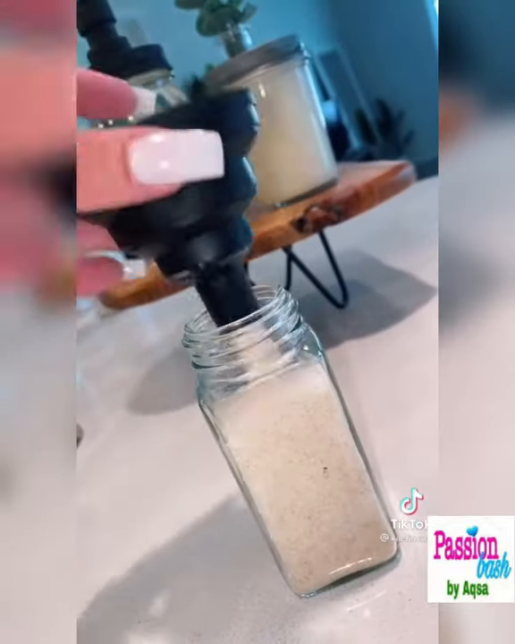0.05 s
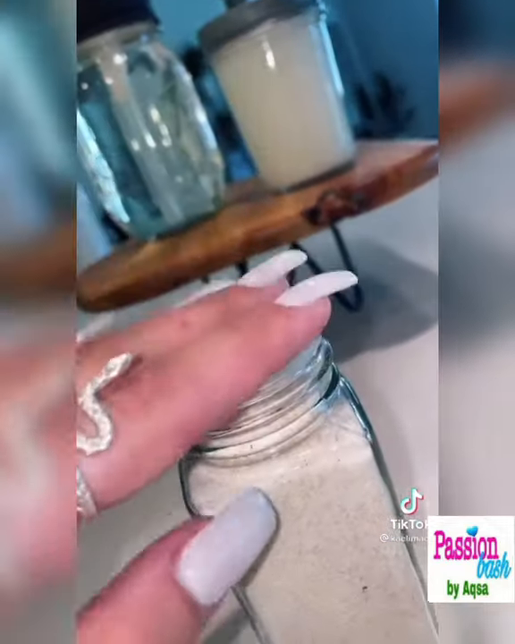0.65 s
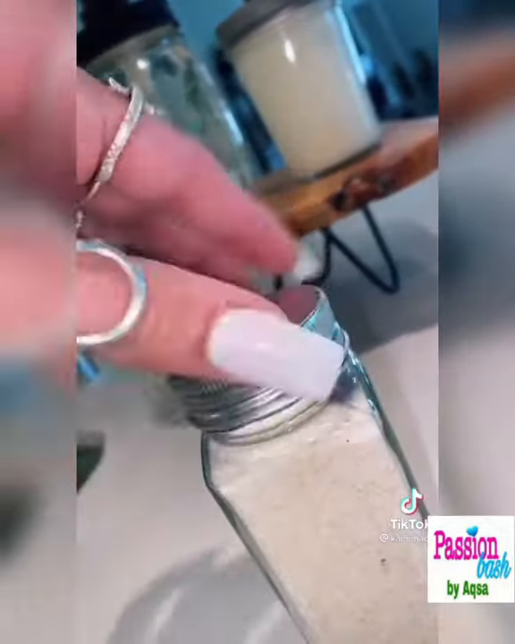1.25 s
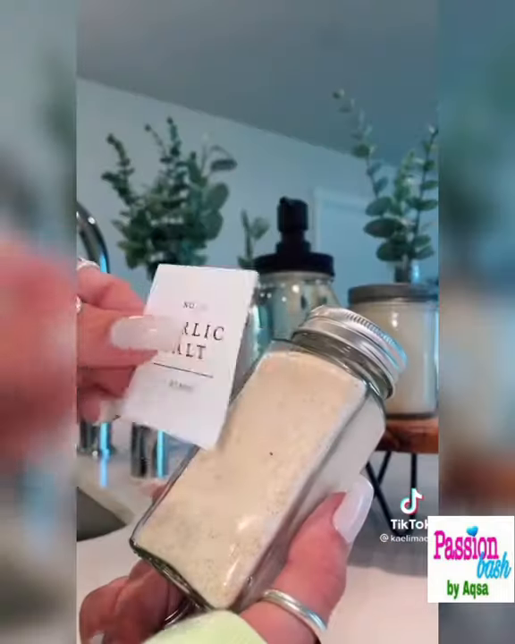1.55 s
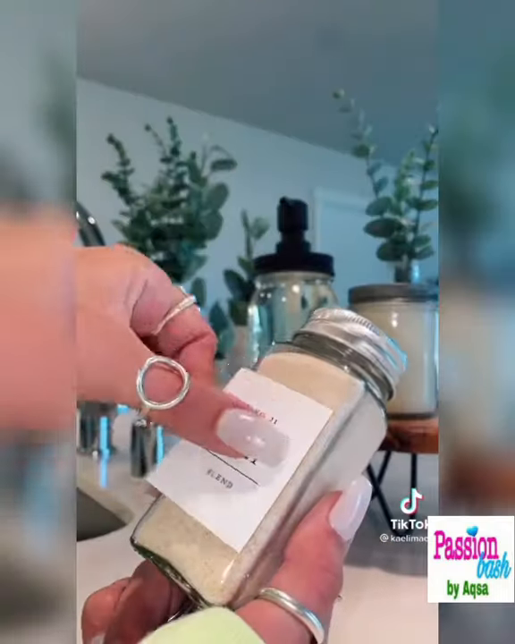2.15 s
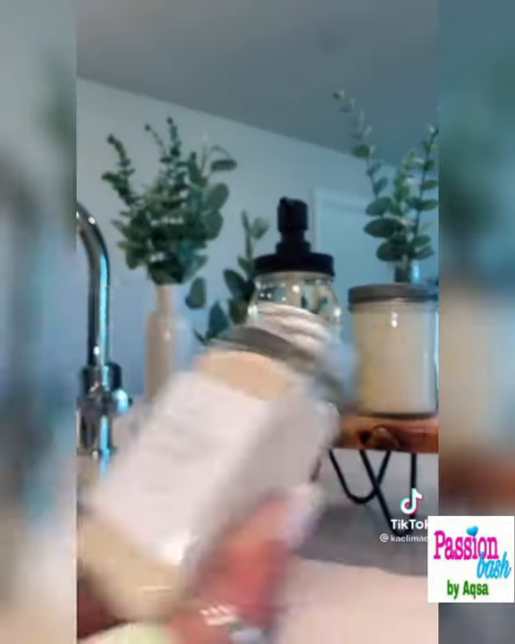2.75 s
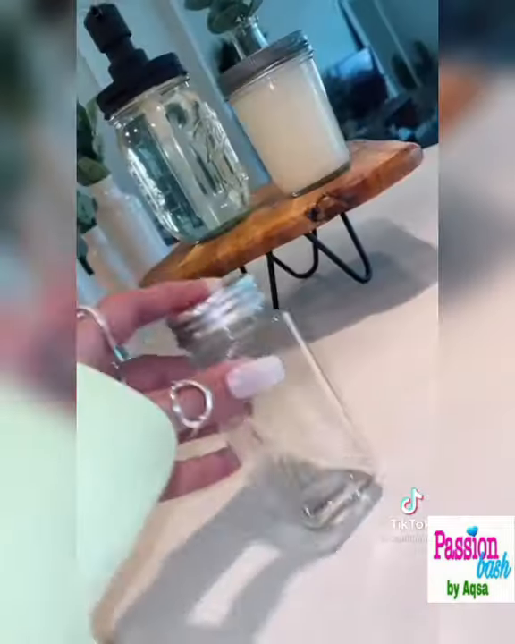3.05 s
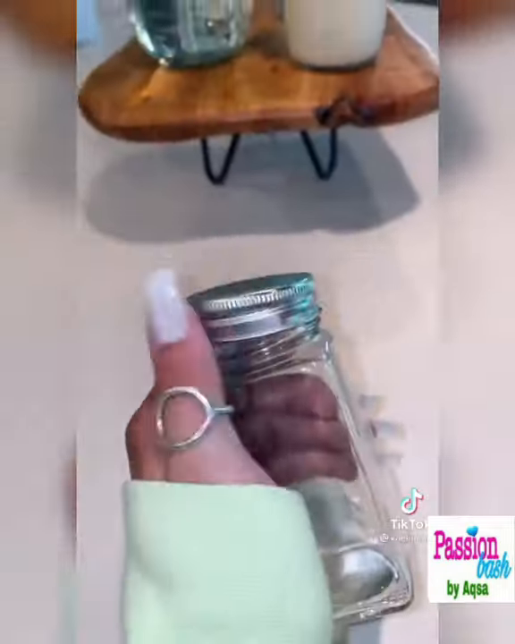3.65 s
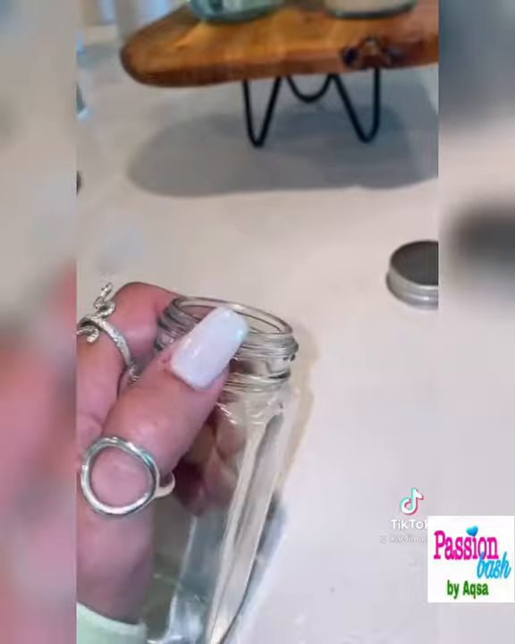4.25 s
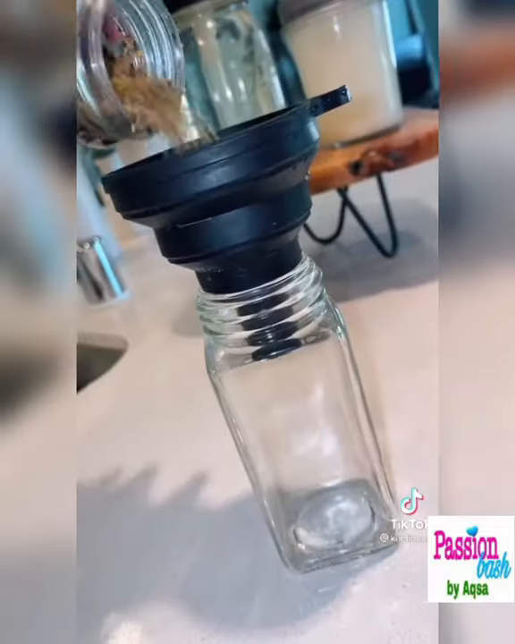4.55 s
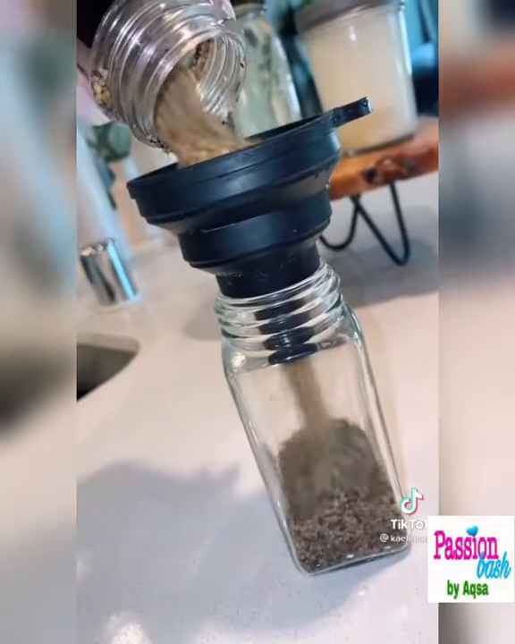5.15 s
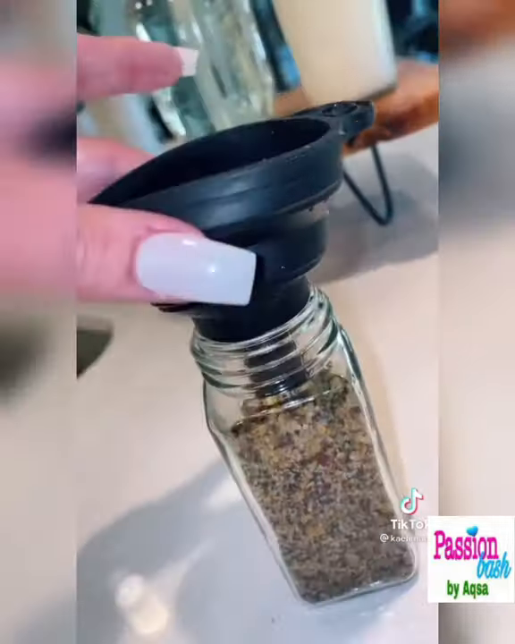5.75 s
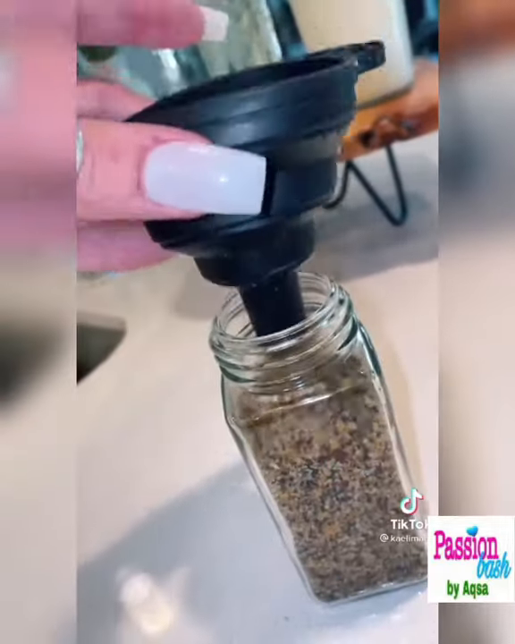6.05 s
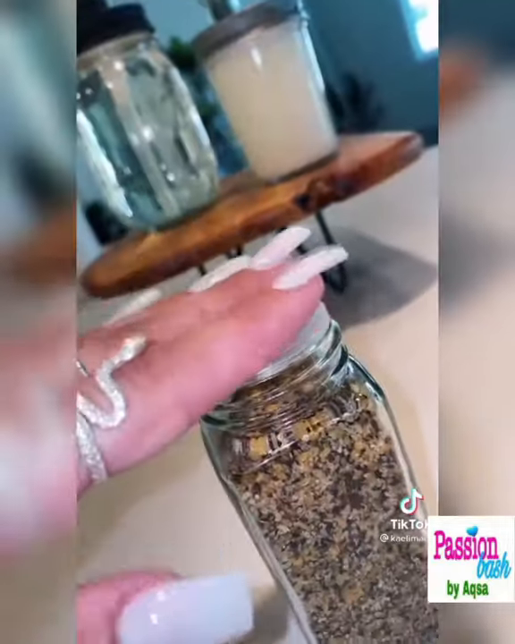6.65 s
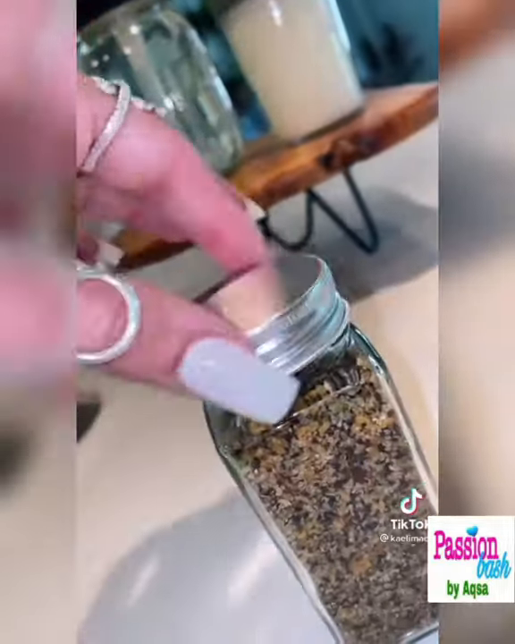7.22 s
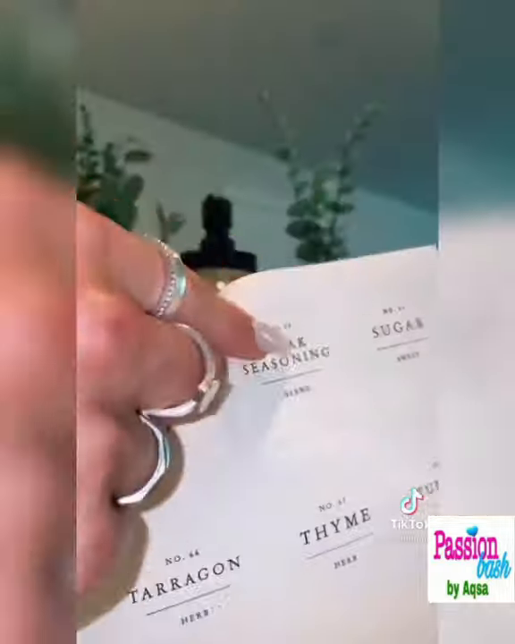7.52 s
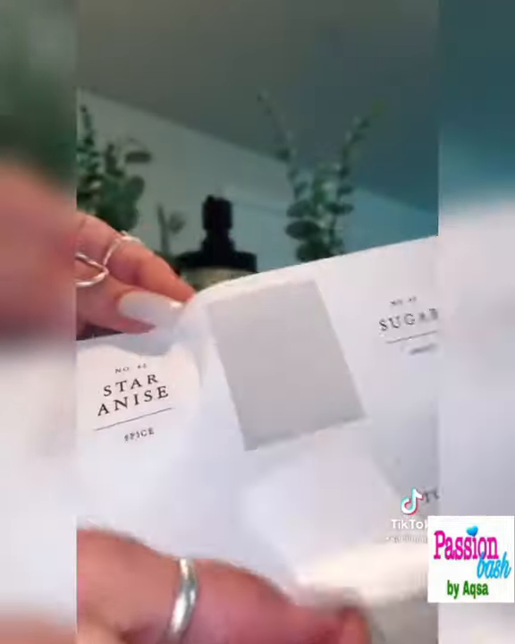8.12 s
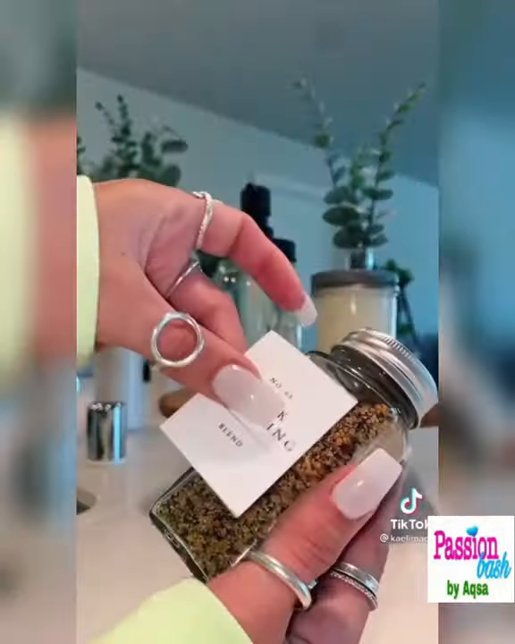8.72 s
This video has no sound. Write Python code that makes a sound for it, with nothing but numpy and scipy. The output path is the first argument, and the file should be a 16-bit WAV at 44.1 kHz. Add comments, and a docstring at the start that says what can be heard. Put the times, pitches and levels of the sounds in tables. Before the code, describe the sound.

Close to the microphone in a quiet kitchen, small glass jars are closed, opened and filled. First come a cap's snap, short scrapes of a metal lid and light paper ticks. Then dull knocks, loud lid clinks and a hollow pop lead to a soft hiss of spice running through a funnel into glass. More knocks and lid twists follow, and a sticky label crackles off its sheet over a faint room hum.

```python
"""Small glass spice jars are handled, filled and labelled close by on a kitchen counter.
Impacts excite the damped modes of the jars, their thin metal lids and their plastic sifter caps, and
stick-slip friction makes the lids rasp on the glass threads. Spice patters through a plastic funnel and
rings the glass until the heap damps it; paper labels buckle and peel. A low room drone lies beneath,
and the whole sound drops out briefly between short passages."""
import sys
import numpy as np
from scipy import signal
from scipy.fft import rfft, irfft
from scipy.io import wavfile

SR = 44100
rng = np.random.default_rng(int(sys.argv[2]) if len(sys.argv) > 2 else 0)


def file_out(sig):
    """Save sig as 16-bit WAV at sys.argv[1]."""
    # one column per channel
    cols = np.atleast_2d(sig).T
    # limit, then scale
    lim = np.clip(cols, -1, 1)
    pcm = np.round(lim * 32767).astype(np.int16)
    wavfile.write(sys.argv[1], SR, pcm)


N = 396018
TAPS = 8192
HZ = np.fft.rfftfreq(TAPS, 1 / SR)  # frequency axis of the gain curves


def amp(db):
    """Amplitude ratio: a factor of ten for every 20 dB."""
    return 10 ** (np.asarray(db) / 20)


def unit_rms(x):
    """Normalisation to unit mean power."""
    return x / np.sqrt(np.mean(x ** 2) + 1e-20)


def curve(points, hz=HZ):
    """Interpolation of (Hz, value) points on a logarithmic frequency axis."""
    point_hz, value = np.transpose(points)
    return np.interp(np.log(hz + 1), np.log(point_hz + 1), value)


def add(mix, s, sound):
    """Superposition: a sound joins the mix at s seconds; what falls outside is dropped."""
    start = round(s * SR)
    inside = sound[max(-start, 0):]
    part = mix[max(start, 0):][:len(inside)]
    part += inside[:len(part)]


def resonances(modes):
    """Modal response: the powers of damped oscillators add up to one gain curve."""
    power = sum(amp(db) ** 2 / (1 + ((HZ ** 2 - hz ** 2) / (width * HZ + 1)) ** 2)
                for hz, width, db in modes)
    return np.sqrt(power)


def ring(force, gain):
    """Convolution: a force drives the causal, minimum-phase body that has this gain curve."""
    log_gain = np.log(np.maximum(gain / gain.max(), 1e-5))
    mirrored = np.concatenate([log_gain, log_gain[-2:0:-1]])
    response = irfft(np.exp(signal.hilbert(mirrored).conj())[:len(HZ)])
    return signal.fftconvolve(force, response[:TAPS // 2])


def grains(count, per_s, spread_db):
    """Shot noise: tiny impacts of uneven size arrive at random moments."""
    chance, size = rng.random((2, count))
    size_db = spread_db * np.minimum(-np.log(size + 1e-12), 4)
    return unit_rms(rng.standard_normal(count) * amp(size_db) * (chance < per_s / SR))


def touch(middle_hz, bass_db, treble_db, ripple_db):
    """Selective excitation: the place and force of a touch tilt the spectrum and favour some modes."""
    knots_hz = np.arange(0, SR / 2, 230)
    favoured_db = ripple_db * np.interp(HZ, knots_hz, rng.standard_normal(len(knots_hz)))
    tilt_db = curve([(middle_hz * 0.37, bass_db), (middle_hz * 0.83, 0),
                     (middle_hz * 1.06, 0), (middle_hz * 2.2, treble_db)])
    return amp(tilt_db + favoured_db)


def tinted(rows, bass_db, treble_db, bass_share):
    """Spectral tint: the last column of each row lifts the treble, and the bass by a share of that."""
    return [(*row, bass_db + bass_share * tint_db, treble_db + tint_db) for *row, tint_db in rows]


def by_force(rows, usual_db, bass_db, treble_db, bass_slope, treble_slope):
    """Force-dependent timbre: bass and treble shift with every dB above the usual level."""
    return [(*row, db, bass_db + bass_slope * (db - usual_db), treble_db + treble_slope * (db - usual_db))
            for *row, db in rows]


def alike(rows, bass_db, treble_db):
    """Constant spectral tilt: every touch gets the same bass and treble."""
    return [(*row, bass_db, treble_db) for row in rows]


def blows(rows, body, middle_hz, chatter, chatter_s, linger=0):
    """Impact excitation: a first contact and a few milliseconds of chatter ring the body."""
    out, t = np.zeros(N), np.arange(SR // 20) / SR
    for s, db, bass_db, treble_db in rows:
        # a gentle touch lingers and rubs where a hard one bounces off
        stretch = 1 + linger * np.clip((-23 - db) / 16, 0, 1)
        force = rng.standard_normal(len(t)) * np.exp(-t / (chatter_s * stretch))
        force *= chatter * stretch / np.linalg.norm(force)
        force[0] = 1
        sound = ring(force, body * touch(middle_hz, bass_db, treble_db, ripple_db=2.5))
        add(out, s, amp(db) * np.sqrt(SR / 100) * sound / np.linalg.norm(sound))  # level over 10 ms
    return out


def strokes(rows, body, middle_hz, slips_per_s, spread_db, bluntness):
    """Stick-slip friction: small slips excite the body while the pressure swells and eases."""
    out, t = np.zeros(N), np.arange(-SR // 7, SR // 7) / SR
    for s, half_length, db, bass_db, treble_db in rows:
        pressure = np.exp(-abs(t / half_length) ** bluntness)
        force = pressure * grains(len(t), slips_per_s, spread_db)
        sound = ring(force, body * touch(middle_hz, bass_db, treble_db, ripple_db=3.5))
        add(out, s + t[0], amp(db) * np.linalg.norm(pressure) * sound / np.linalg.norm(sound))
    return out


def flow(times, level_db, body, per_s, spread_db):
    """Sustained random excitation: a shower of tiny impacts on a body follows a level curve."""
    out, t = np.zeros(N), np.arange(times[0], times[-1], 1 / SR)
    sound = unit_rms(ring(grains(len(t), per_s, spread_db), body)[:len(t)])
    add(out, times[0], sound * amp(np.interp(t, times, level_db)) * signal.windows.tukey(len(t), .02))
    return out


# The drone of the house. Each row: frequency in Hz, relative spectral density in dB.
ROOM_SPECTRUM = [(15, -39.5), (25, -23), (92, -3), (153, -4.5), (212, 2.5), (285, -11), (354, -13.5),
                 (695, -22), (818, -19.5), (1560, -28.5), (2110, -30.5), (4250, -36.5), (5140, -36),
                 (14800, -47), (16000, -47.5)]
# The passages between dropouts. Each row: start in seconds, end in seconds, drone gain in dB.
PASSAGES = [(0, 0.241, 1.5), (0.286, 0.693, 4.5), (0.741, 1.331, 4.5), (1.376, 2.845, -2),
            (2.882, 3.256, 2), (3.273, 4.287, 6), (4.34, 5.609, 2), (5.633, 6.233, 2.5),
            (6.273, 6.722, 3.5), (6.765, 7.416, 4), (7.436, 8.367, 1), (8.385, 9.003, -3.5)]


def room_tone():
    """Spectrally shaped noise: the house drones low, with a faint hiss above."""
    noise = irfft(rfft(rng.standard_normal(N)) * amp(curve(ROOM_SPECTRUM, np.fft.rfftfreq(N, 1 / SR))), N)
    passages = np.array(PASSAGES)
    gain_db = np.interp(np.arange(N) / SR, passages[:, :2].ravel(), np.repeat(passages[:, 2], 2))
    return amp(-59.5 + gain_db) * unit_rms(noise)


# The kitchen's reverberation. Each row: frequency in Hz, time to fall 60 dB in seconds.
REVERB_TIMES = [(200, 0.66), (700, 0.29), (2000, 0.25), (6000, 0.19), (15000, 0.15)]


def kitchen(x, build_s):
    """Reverberation: reflections from counter and walls build up, then each band decays at its own rate."""
    hz, t, bands = signal.stft(rng.standard_normal(SR // 2), SR, nperseg=256)
    bands = bands * amp(-60 * t / curve(REVERB_TIMES, hz)[:, None]) * (1 - np.exp(-t / build_s))
    tail = signal.istft(bands, SR)[1]
    return signal.fftconvolve(x, tail / np.linalg.norm(tail))[:N]


# The response of label paper. Each row: frequency in Hz, gain in dB.
PAPER_SPECTRUM = [(71, -27), (120, 2.5), (412, -7.5), (580, 0), (869, -1.5), (1230, -3.5), (2110, -8),
                  (2800, -6.5), (3170, -8.5), (6040, -2.5), (7700, -11), (10400, -19.5), (15000, -26)]
# Fingernails and creases ticking. Each row: start in seconds, level over 10 ms in dB.
PAPER_TICKS = [(1.4244, -49), (1.477, -57), (2.1109, -58), (2.1699, -52), (2.548, -53), (2.5977, -53.5),
               (7.5106, -59), (7.5687, -43), (7.6303, -35.5), (7.6677, -54), (7.6803, -44.5), (7.6933, -46),
               (7.7031, -52), (7.7361, -44.5), (7.7494, -53.5), (7.8815, -54), (7.9023, -48),
               (7.9102, -45.5), (8.0419, -37.5), (8.0452, -33.5), (8.0702, -43), (8.0885, -37),
               (8.2894, -57), (8.5785, -49), (8.6024, -49), (8.865, -67)]
# Labels bent and smoothed. Each row: centre and half-length in seconds, level and tint in dB.
PAPER_RUSTLES = [(1.5261, 0.0074, -36, -4), (1.5476, 0.0092, -36.5, -3), (2.12, 0.02, -52, -7),
                 (2.2764, 0.03, -65.5, 5), (2.573, 0.013, -43, -1.5), (2.7133, 0.015, -50.5, 0),
                 (7.6218, 0.01, -49.5, 7), (7.8172, 0.033, -57, 15), (7.9428, 0.017, -36, 6.5),
                 (8.0021, 0.0087, -48.5, 1), (8.0573, 0.013, -37.5, -19), (8.0896, 0.017, -43.5, 5),
                 (8.2513, 0.019, -48, 10), (8.427, 0.0084, -28, 2), (8.6023, 0.013, -48, 10.5)]
# Fingers holding and rubbing the paper. Each row: start and end in seconds, level in dB.
FINGER_HOLDS = [(1.375, 1.599, -71), (1.98, 2.661, -73), (2.68, 2.863, -66), (7.49, 8.299, -61.5),
                (8.305, 8.655, -71.5)]


def labels():
    """Buckling and friction: paper ticks and whispers under the fingers; its glue crackles as it parts."""
    body = amp(curve(PAPER_SPECTRUM))
    # a louder tick is a larger patch of paper buckling, so it is duller
    creases = by_force(PAPER_TICKS, usual_db=-45, bass_db=-2.5, treble_db=0.2,
                       bass_slope=0.31, treble_slope=-0.74)
    ticks = blows(creases, body, middle_hz=3730, chatter=0.94, chatter_s=0.0016)
    rubbing = tinted(PAPER_RUSTLES, bass_db=-4.5, treble_db=1, bass_share=-0.057)
    rustles = strokes(rubbing, body, middle_hz=4360, slips_per_s=5000, spread_db=1.0, bluntness=1.55)
    whisper = sum(flow([start, end], [db, db], body, per_s=3300, spread_db=3.0)
                  for start, end, db in FINGER_HOLDS)
    glue = body * touch(middle_hz=3940, bass_db=-3, treble_db=4, ripple_db=7.5)
    peel = flow(times=[7.76, 8.11], level_db=[-55, -55], body=glue, per_s=160, spread_db=4.5)
    return ticks + rustles + whisper + peel


# Clumps shaken into the funnel. Each row: peak time and 20 dB rise time in seconds, relative level in dB.
CLUMPS = [(4.527, 0.03, -47), (4.685, 0.025, -49), (4.875, 0.087, -53)]
RUN_DB = -64.5  # the even run of spice, on the same scale


def spice_flow(s, run_from_s=4.76, run_to_s=5.55, run_fade_s=0.11, fade_db_per_s=226):
    """Incoherent addition: the powers of clumps and an even run give the flow's relative level in dB."""
    clumps = sum(amp(db - np.maximum(20 * (at - s) / rise_s, fade_db_per_s * (s - at))) ** 2
                 for at, rise_s, db in CLUMPS)
    outside_s = np.maximum(np.maximum(run_from_s - s, s - run_to_s), 0)
    return 10 * np.log10(clumps + amp(RUN_DB - 20 * outside_s / run_fade_s) ** 2)


def fullness(s, heap_from_s=4.69, fill_s=1.24):
    """Steady accumulation: the share of the jar that the heap fills grows linearly."""
    return np.clip((s - heap_from_s) / fill_s, .02, .8)


def landing(s, run_db, follow, heap_db, fall_s=0.029):
    """Delay and damping: the level in dB in the jar follows the flow after the fall; the heap lowers it."""
    return run_db + follow * (spice_flow(s - fall_s) - RUN_DB) + heap_db * fullness(s)


# The response of the plastic funnel. Each row: frequency in Hz, gain in dB.
FUNNEL_SPECTRUM = [(200, -26.5), (700, -6), (1300, -4.5), (1850, 0.5), (2600, -5), (3800, -18), (8000, -22),
                   (16000, -36)]
# The hiss of falling spice. Each row: frequency in Hz, gain in dB.
STREAM_SPECTRUM = [(1000, -9), (3500, -16), (6000, 4), (8500, -4), (10500, -3), (13000, 0.5), (15200, 9),
                   (16000, 0)]
# The air above the heap. Each row: frequency and bandwidth in Hz, gain in dB.
HEADSPACE_MODES = [(1786, 240, 0)]
# The glass wall struck by grains. Each row: frequency and bandwidth in Hz, gain in dB.
GLASS_MODES = [(5125, 21, 6), (8400, 51, 2), (10600, 42, -4.5), (11300, 72, 3), (12597, 50, -9),
               (13679, 78, 3), (13824, 69, 0), (14930, 54, -3)]
# Spurts of spice shaken out. Each row: centre and half-length in seconds, level in dB.
SPICE_SPURTS = [(4.89, 0.085, -55.5), (5.06, 0.0087, -46), (5.11, 0.14, -54.5), (5.4, 0.06, -53),
                (5.578, 0.019, -55.5), (5.8, 0.015, -69), (6.2, 0.018, -65)]
# The funnel dragged from the neck with its last grains.
# Each row: centre and half-length in seconds, then level, bass and treble in dB.
FUNNEL_DRAGS = [(.06, 0.059, -59, 5, -1.5), (6.04, 0.064, -61.5, -4, 9.5)]


def pour(from_s=4.47, to_s=5.61, split_hz=9000):
    """Granular impacts: spice rings funnel and glass; the air above the heap resonates as the jar fills."""
    s = np.arange(from_s, to_s, 1 / SR)
    funnel, stream = amp(curve(FUNNEL_SPECTRUM)), amp(curve(STREAM_SPECTRUM))
    air = resonances(HEADSPACE_MODES)
    patter_db, filled = spice_flow(s), fullness(s)
    patter = flow(s, patter_db + 10 * np.log10(1 - filled), funnel, per_s=5000, spread_db=0.5)
    headspace = flow(s, patter_db + 10 * np.log10(filled), air, per_s=4200, spread_db=0.0)
    hiss = flow(s, landing(s, run_db=-62, follow=0.12, heap_db=-11), stream, per_s=9000, spread_db=4.0)
    # the high modes need hard hits on bare glass and are the first that the heap silences
    low = resonances([mode for mode in GLASS_MODES if mode[0] < split_hz])
    high = resonances([mode for mode in GLASS_MODES if mode[0] >= split_hz])
    glass = flow(s, landing(s, run_db=-60.5, follow=0.42, heap_db=-23), low, per_s=2500, spread_db=1.8)
    glass += flow(s, landing(s, run_db=-58, follow=0.96, heap_db=-150), high, per_s=2500, spread_db=3.0)
    spurts = strokes(alike(SPICE_SPURTS, bass_db=8, treble_db=3.0), stream,
                     middle_hz=5000, slips_per_s=6000, spread_db=2.5, bluntness=4.2)
    drags = strokes(FUNNEL_DRAGS, np.hypot(air, amp(-20) * funnel),
                    middle_hz=1910, slips_per_s=4300, spread_db=2.5, bluntness=1.45)
    return amp(2.0) * (patter + headspace) + hiss + glass + spurts + drags


# The response of the sifter cap. Each row: frequency in Hz, gain in dB.
PLASTIC_SPECTRUM = [(210, -31.5), (350, -3.5), (653, -12), (1240, -13), (1880, -7.5), (2710, -10),
                    (2980, -8.5), (8040, -8.5), (13200, -19.5), (14500, -8), (16000, -23.5)]
# Caps snapping over the rim. Each row: start in seconds, then level over 10 ms, bass and treble in dB.
CAP_SNAPS = [(0.5508, -26, 6.5, 1.5), (0.7968, -35.5, 11, -5), (0.8526, -46.5, 10, 4),
             (0.9391, -40, 2.5, 2), (0.9558, -34.5, -4, 8), (1.2452, -50, 4, 11), (4.0518, -20.5, 8.5, 3),
             (4.1026, -23.5, -8.5, -4.5), (4.1617, -33.5, -1, -19.5)]
# The cap sliding on the rim. Each row: centre and half-length in seconds, level and tint in dB.
CAP_SLIDES = [(0.546, 0.0083, -35, 8), (0.5658, 0.031, -50, -8), (4.123, 0.022, -38, -3),
              (4.185, .055, -47.5, -6.5), (4.3942, 0.026, -56.5, 18), (6.3989, 0.011, -51, 0),
              (6.6259, 0.014, -44, 9), (6.6613, 0.032, -56, -2)]


def sifter():
    """Friction and impact: the plastic cap slides up to the rim and snaps over it."""
    body = amp(curve(PLASTIC_SPECTRUM))
    snaps = blows(CAP_SNAPS, body, middle_hz=3980, chatter=4.6, chatter_s=0.0038)
    slides = tinted(CAP_SLIDES, bass_db=1, treble_db=0.0, bass_share=.6)
    return snaps + strokes(slides, body, middle_hz=3800, slips_per_s=8900, spread_db=3.0, bluntness=2.8)


# Air and walls of the empty jar. Each row: frequency in Hz, relative level in dB, 60 dB decay in seconds.
POP_MODES = [(370, -29, 0.058), (637, 2.5, 0.066), (1168, -16.5, 0.059), (2200, -23.5, 0.24),
             (4200, -31, 0.076), (5518, -37.5, 0.06)]


def pop(at_s=4.0522, gain_db=-10, rise_s=0.00041):
    """Free vibration: pulling the cap off leaves the hollow jar ringing in decaying sinusoids."""
    out, t = np.zeros(N), np.arange(SR // 4) / SR
    modes = sum(amp(gain_db + db - 60 * t / t60) * np.sin(2 * np.pi * hz * t) for hz, db, t60 in POP_MODES)
    add(out, at_s, modes * (1 - np.exp(-t / rise_s)))
    return out


# The thin metal lid. Each row: frequency in Hz, bandwidth in Hz at a damping of 1, gain in dB.
LID_MODES = [(1320, 45, -0.5), (2550, 76, -13), (3790, 50, -9), (4430, 43, -7), (4500, 45, -3),
             (5770, 150, -17.5), (6300, 140, -14.5), (6676, 89, -10), (8540, 70, -5.5), (8265, 52, -5),
             (9450, 400, -26.5), (11960, 500, -25), (13840, 76, -17), (15300, 150, -21.5)]
# The rasp of metal on glass. Each row: frequency in Hz, relative gain in dB.
RASP_SPECTRUM = [(260, -39.5), (450, -4.5), (1070, -15), (1300, 2.5), (1630, -14), (2510, -10.5),
                 (2870, -22), (4490, -10.5), (7580, -14), (8670, -8), (11000, -24.5), (14800, -16),
                 (16000, -24)]


def lid_body(damping, rasp_db):
    """Damping broadens resonance: the thread's grip widens the lid's modes, which stand over its rasp."""
    modes = resonances([(hz, damping * width, db) for hz, width, db in LID_MODES])
    return np.hypot(modes, amp(rasp_db) * amp(curve(RASP_SPECTRUM)))


# The loose lid striking the neck. Each row: start in seconds, unchoked level over 10 ms and tint in dB.
LID_CLINKS = [(3.494, -41, -7), (3.6285, -49, 4), (3.6496, -43, 2.5), (3.6838, -24, -12),
              (3.7354, -15, 7.5), (3.772, -12, -5.5), (3.7959, -16, 1.5)]
# Fingers closing on the lid to choke its ring. Each row: time in seconds, gain in dB.
FINGER_CHOKE = [(3.812, -1.5), (3.835, -30.5)]
# The lid turning on the thread. Each row: centre and half-length in seconds, level in dB.
LID_TURNS = [(0.7998, 0.013, -44.5), (0.8766, 0.0069, -40), (0.9585, 0.013, -37), (1.1933, 0.0088, -37),
             (1.2507, 0.011, -44), (1.286, 0.013, -44.5), (3.291, 0.007, -48.5), (3.406, 0.015, -38),
             (3.429, 0.014, -30.5), (3.5053, 0.012, -40.5), (3.5493, 0.011, -30), (3.6757, 0.0096, -41.5),
             (3.732, 0.0062, -24), (3.766, 0.016, -34), (6.8407, 0.0067, -36), (6.874, 0.015, -40.5),
             (6.912, 0.0098, -28.5), (6.998, 0.016, -43.5), (7.0291, 0.0094, -28.5), (7.118, 0.012, -46),
             (7.223, 0.017, -47.5), (7.2826, 0.0086, -34.5), (7.322, 0.016, -47.5)]


def lid(unscrew_from_s=3.27, unscrew_to_s=3.9):
    """Contact damping: the metal lid rasps while the thread holds it and rings out once it is loose."""
    strikes = tinted(LID_CLINKS, bass_db=-1.5, treble_db=-1.5, bass_share=0.87)
    clinks = blows(strikes, lid_body(damping=0.95, rasp_db=-25),
                   middle_hz=3800, chatter=4.4, chatter_s=0.0045)
    choke = amp(np.interp(np.arange(N) / SR, *np.transpose(FINGER_CHOKE)))
    opening = [row for row in LID_TURNS if unscrew_from_s < row[0] < unscrew_to_s]
    closing = [row for row in LID_TURNS if row not in opening]
    # a loosening lid rings more freely; a tightening one is brighter, the more so the harder the push
    loosen = strokes(alike(opening, bass_db=-4.0, treble_db=-5.0), lid_body(damping=2.8, rasp_db=-4),
                     middle_hz=3750, slips_per_s=12000, spread_db=2.5, bluntness=1.4)
    pushes = by_force(closing, usual_db=-40.5, bass_db=2.5, treble_db=3.5,
                      bass_slope=0.036, treble_slope=.35)
    tighten = strokes(pushes, lid_body(damping=3.3, rasp_db=1.5),
                      middle_hz=3700, slips_per_s=7000, spread_db=2.5, bluntness=1.41)
    return clinks * choke + loosen + tighten


# The jar held in the hand. Each row: frequency and bandwidth in Hz, relative gain in dB.
JAR_MODES = [(326, 90, 4.5), (480, 55, -15), (707, 50, 6.5), (958, 43, 2.5), (1205, 98, 6.5),
             (1620, 63, -8), (6890, 35, -20)]
# The broad thud of a knock. Each row: frequency in Hz, gain in dB.
THUD_SPECTRUM = [(60, -24.5), (130, -18), (300, -1.5), (1200, -2), (2200, -8), (4000, -21), (8000, -51),
                 (16000, -67)]
# The air in the empty jar. Each row: frequency and bandwidth in Hz, gain in dB.
CAVITY_MODES = [(347, 38, -2), (1260, 19, -6.5), (2347, 78, -18.5)]
# Dull knocks of jar, funnel and cap. Each row: start in seconds, level over 10 ms and tint in dB.
JAR_KNOCKS = [(0.3642, -47.5, -9), (0.4276, -38.5, 4), (0.473, -41.5, -1), (0.492, -39, -5),
              (0.551, -36, 8), (1.1484, -37, -20), (1.9857, -55.5, 0), (2.748, -41.5, 18.5),
              (3.0322, -17, -0.5), (3.1029, -22, -3), (3.1631, -33.5, -5), (3.8645, -48, 2),
              (5.6851, -57, 13), (5.7381, -49.5, 1), (5.969, -50, 10), (6.327, -45, 3.5),
              (6.4225, -33.5, -5), (6.4529, -40, -3), (6.4881, -42, 12), (6.555, -26, -5)]
# The jar shifting under the hand. Each row: centre and half-length in seconds, level in dB.
JAR_RUBS = [(0.8234, 0.019, -46), (1.074, 0.027, -45.5), (1.1604, 0.018, -41.5), (1.2627, 0.015, -44.5),
            (3.0272, 0.0085, -34), (6.4938, 0.016, -44.5), (6.583, .01, -42), (7.1116, 0.0194, -43),
            (7.1979, 0.019, -46.5), (7.3304, 0.025, -47.5), (7.385, 0.011, -55.5)]
# The loose lid juddering on the empty jar. Each row: centre and half-length in seconds, level in dB.
CAVITY_JUDDERS = [(3.3, 0.016, -45), (3.406, 0.016, -33), (3.45, 0.014, -51.5), (3.502, 0.013, -38),
                  (3.548, 0.0059, -34.5), (3.642, 0.014, -41.5)]


def jar(soft_hz=3500, rebound_s=0.0062, rebound_db=-11.5):
    """Damped resonance: the hand-held jar knocks and rubs on the counter; empty, its air sounds hollow."""
    softened = resonances(JAR_MODES) / np.hypot(1, HZ / soft_hz)  # the counter takes the edge off
    body = np.hypot(softened, amp(curve(THUD_SPECTRUM)))
    # after each knock the thing rocks back once, more weakly
    rebounds = [(s + rebound_s, db + rebound_db, tint_db) for s, db, tint_db in JAR_KNOCKS]
    contacts = tinted(JAR_KNOCKS + rebounds, bass_db=1.0, treble_db=-9.5, bass_share=1.05)
    knocks = blows(contacts, body, middle_hz=1002, chatter=2.0, chatter_s=0.0028, linger=1.21)
    rubs = strokes(alike(JAR_RUBS, bass_db=3.0, treble_db=-9.5), body,
                   middle_hz=970, slips_per_s=4600, spread_db=3.5, bluntness=6.7)
    judders = strokes(alike(CAVITY_JUDDERS, bass_db=2.5, treble_db=-0.5), resonances(CAVITY_MODES),
                      middle_hz=990, slips_per_s=3400, spread_db=2.0, bluntness=5.2)
    return knocks + rubs + judders


def scene():
    """Direct and reverberant sound: each source stands straight ahead and sends a share into the room."""
    glass, metal, plastic, hollow, spice, paper = jar(), lid(), sifter(), pop(), pour(), labels()
    direct = glass + metal + plastic + hollow + spice + paper
    send = (amp(-20.5) * glass + amp(-42) * metal + amp(-18.5) * plastic + amp(-17.5) * hollow
            + amp(-29.0) * (spice + paper))
    mix = direct + kitchen(send, build_s=.006) + room_tone()
    return np.array([mix, mix])


def record(dry, rise_s=0.0037, fall_s=0.0065, edge_hz=15900):
    """Gating and band limiting: the level dips 26 dB between passages, and the top treble is cut."""
    t = np.arange(N) / SR
    gate = sum(np.clip((t - start) / rise_s, 0, 1) * np.clip((end - t) / fall_s, 0, 1)
               for start, end, _ in PASSAGES)
    gated = dry * np.maximum(gate, amp(-26.0))
    lowpass = signal.firwin(301, edge_hz, window=("kaiser", 9), fs=SR)
    return signal.oaconvolve(gated, lowpass[None], "same")


dry = scene()
out = record(dry)
file_out(out)
```